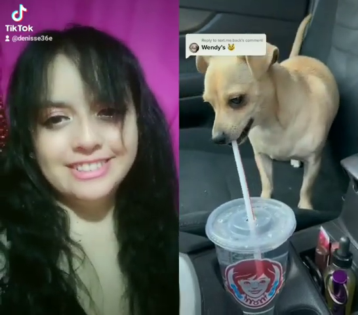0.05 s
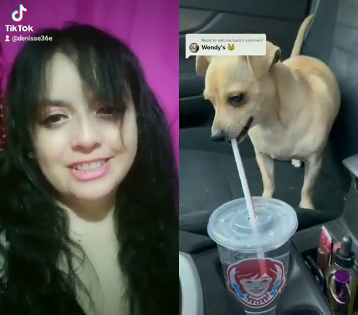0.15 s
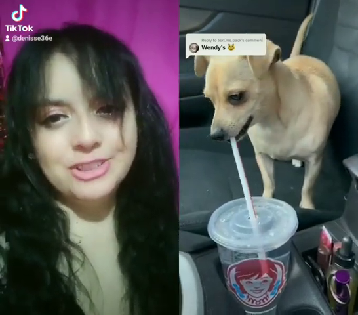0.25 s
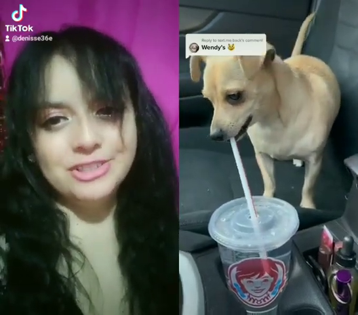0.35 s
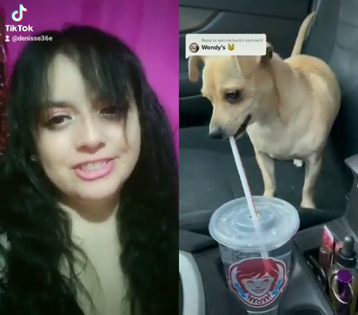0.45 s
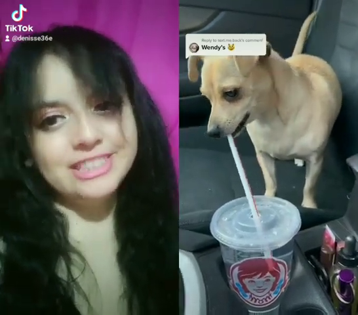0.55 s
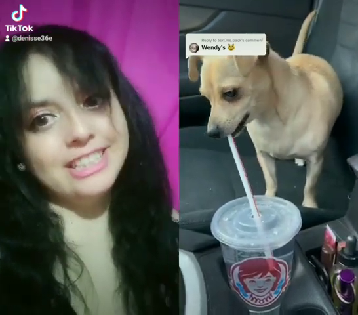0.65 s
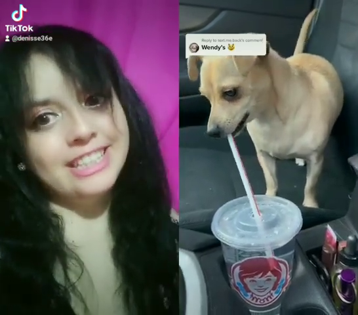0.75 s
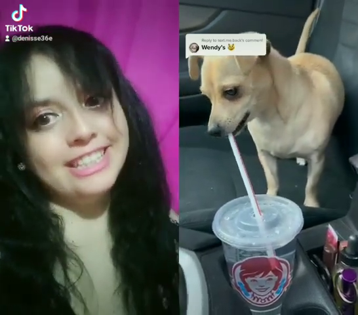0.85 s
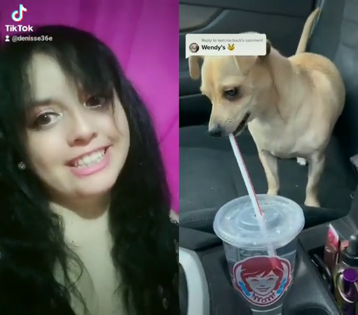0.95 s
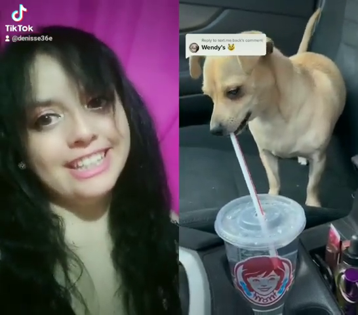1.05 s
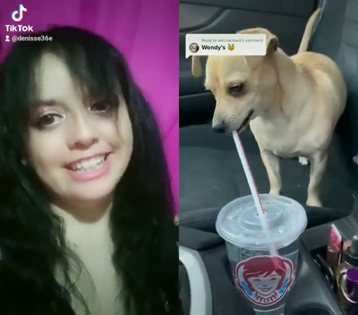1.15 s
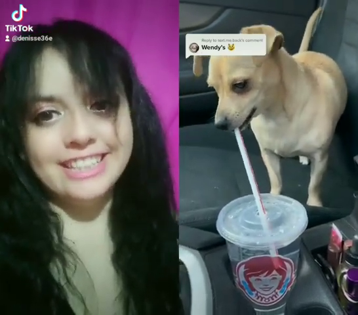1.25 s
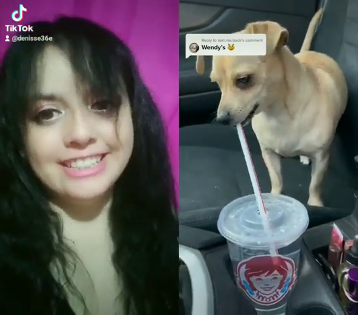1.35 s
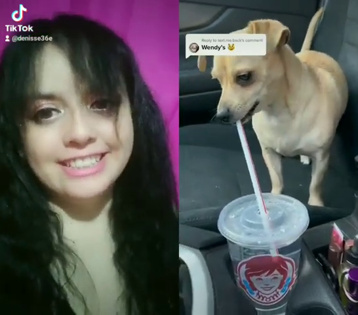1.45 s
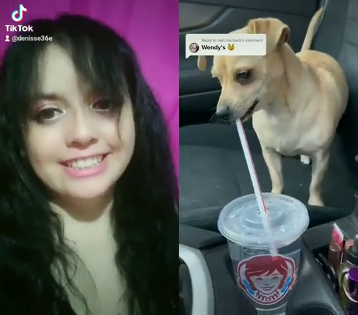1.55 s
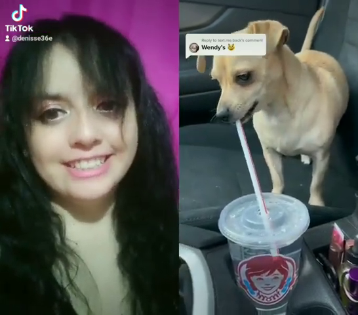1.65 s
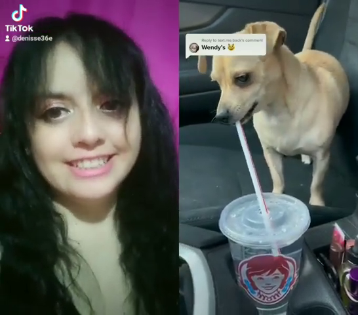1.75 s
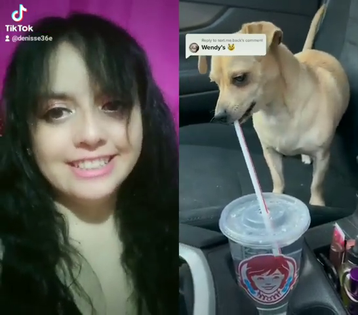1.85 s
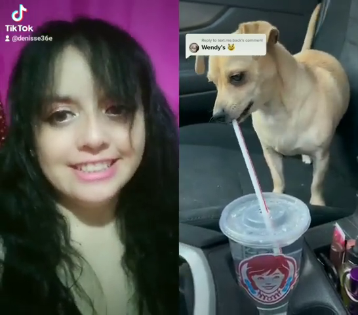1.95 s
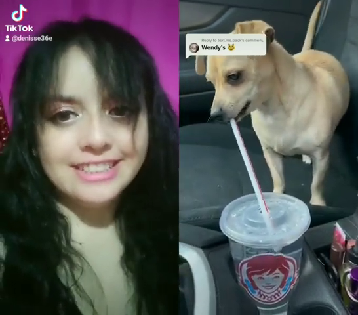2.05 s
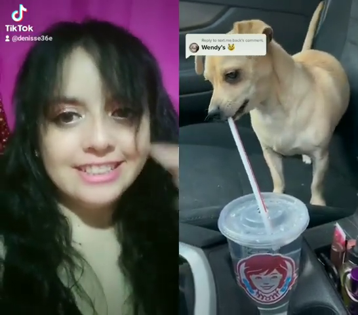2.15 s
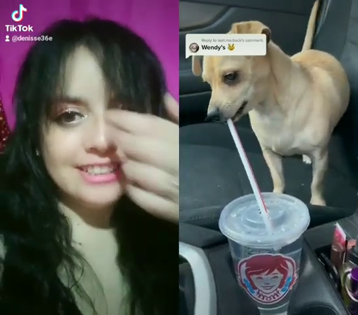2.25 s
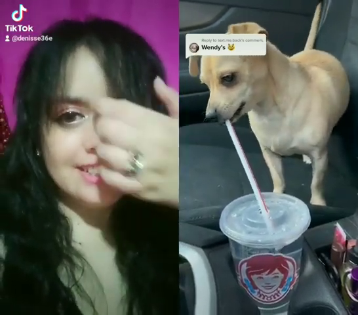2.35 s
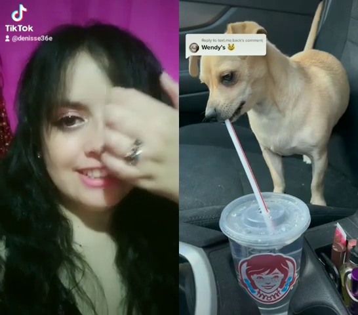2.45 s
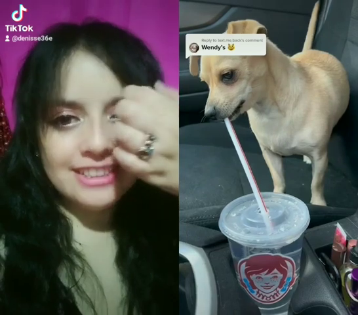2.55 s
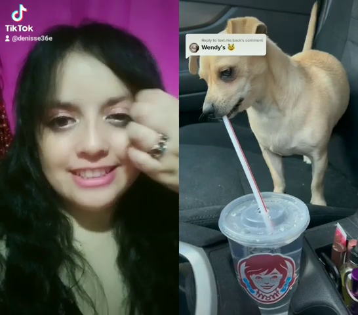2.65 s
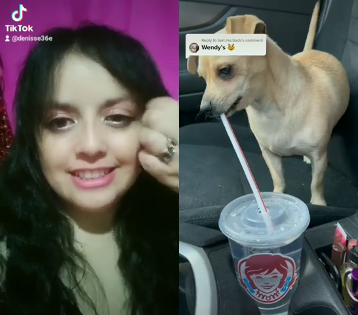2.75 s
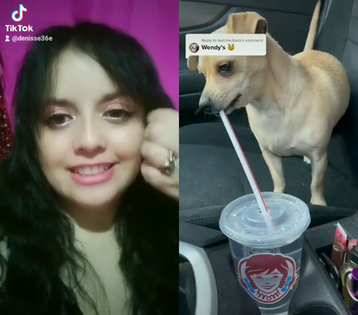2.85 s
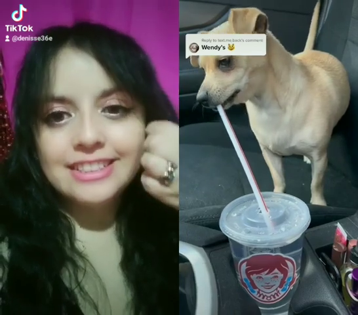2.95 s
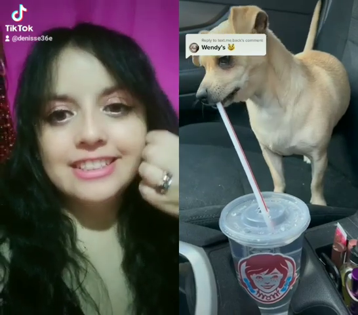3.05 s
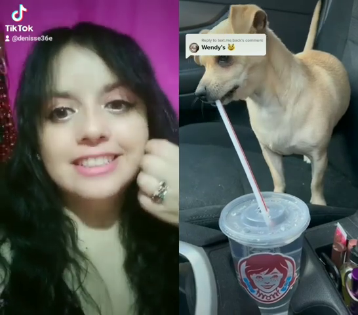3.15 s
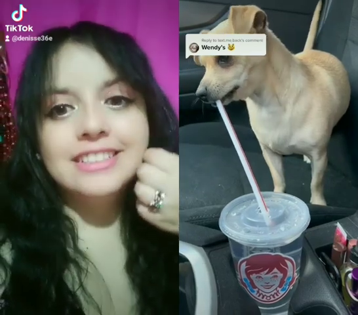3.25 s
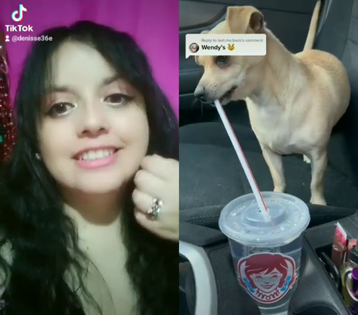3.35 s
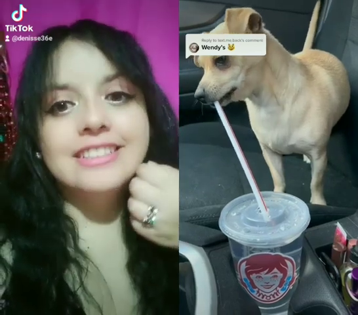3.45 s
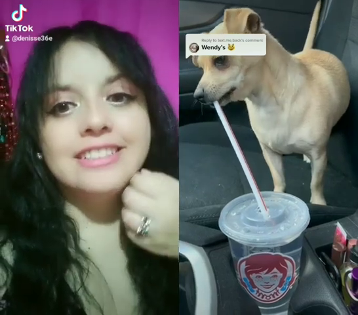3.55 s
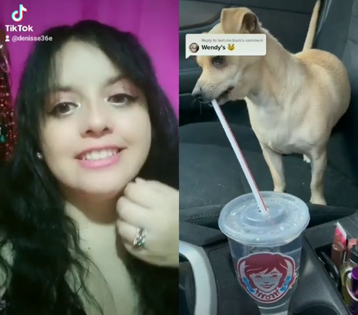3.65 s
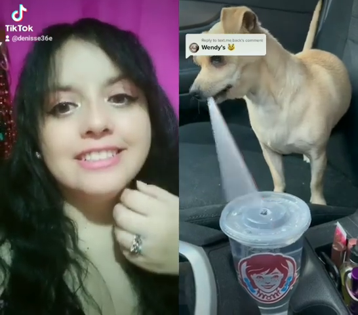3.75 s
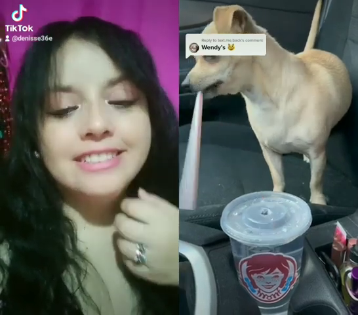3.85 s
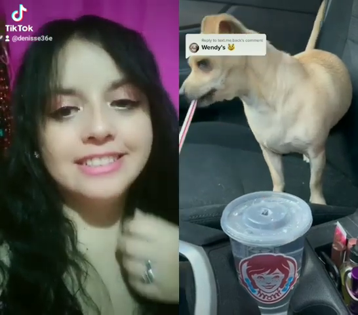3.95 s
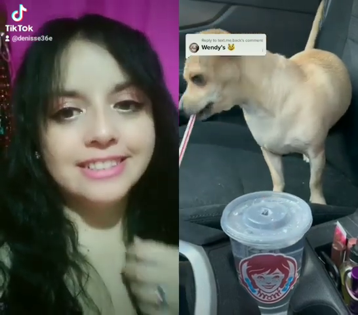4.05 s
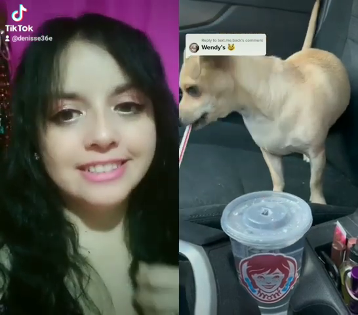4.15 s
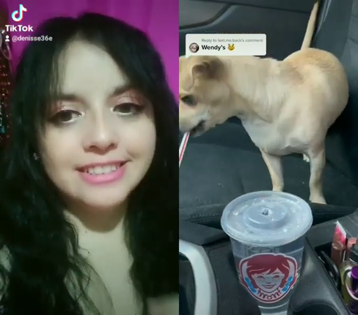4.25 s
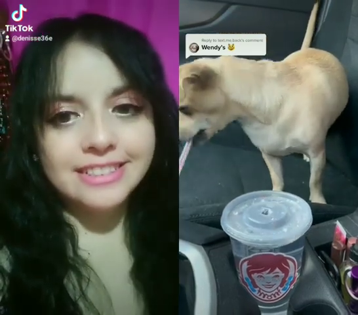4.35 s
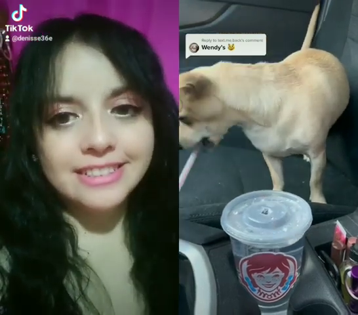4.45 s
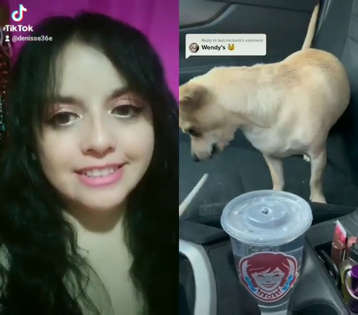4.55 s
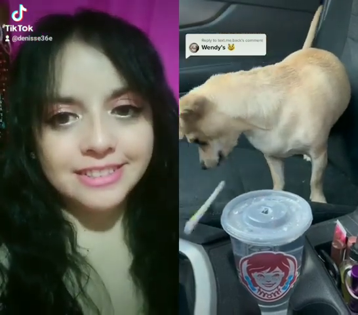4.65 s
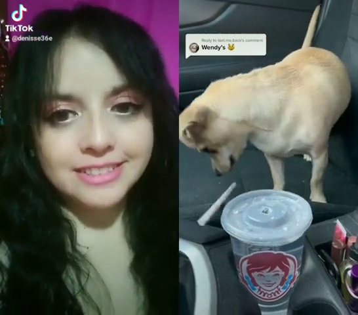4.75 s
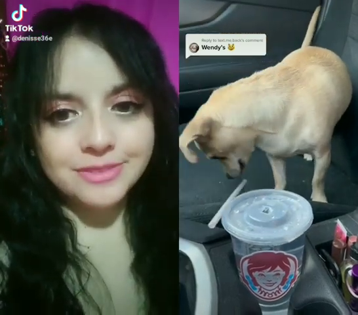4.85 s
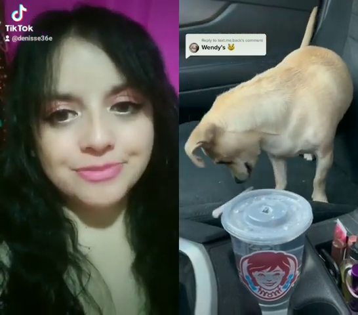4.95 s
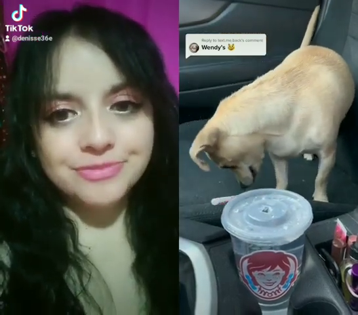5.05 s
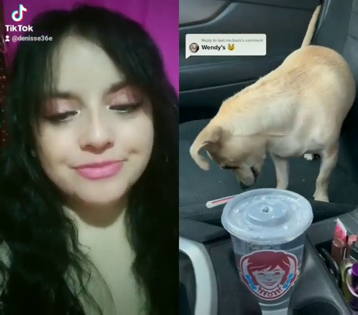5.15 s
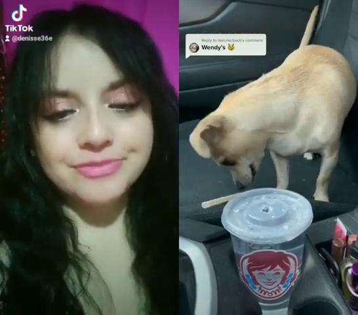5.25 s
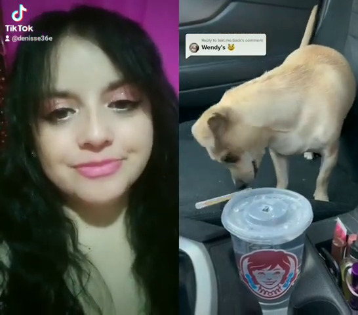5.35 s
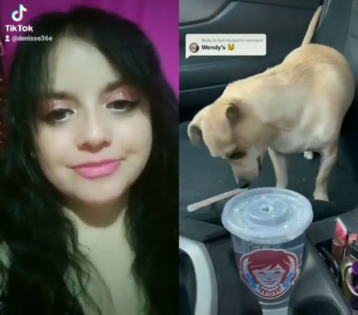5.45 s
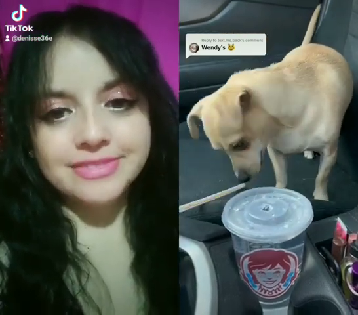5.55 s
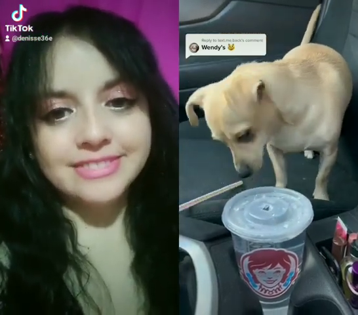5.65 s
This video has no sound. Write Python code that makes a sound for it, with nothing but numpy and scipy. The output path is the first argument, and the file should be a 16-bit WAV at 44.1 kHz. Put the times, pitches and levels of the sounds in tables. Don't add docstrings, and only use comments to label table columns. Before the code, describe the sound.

Close, dry plastic clicks and short stick-slip squeaks end in a hollow pop and light straw taps over a low engine hum.

```python
import sys
import numpy as np
from scipy import signal
from scipy.fft import rfft, irfft
from scipy.io import wavfile

SR = 44100
rng = np.random.default_rng(int(sys.argv[2]) if len(sys.argv) > 2 else 0)


def voltage_ratio(decibels):
    exponent = np.asarray(decibels, float) / 20
    return 10 ** exponent


def pcm_store(signal):
    levels = np.round(np.clip(np.atleast_2d(signal), -1, 1) * 32767)
    wavfile.write(sys.argv[1], SR, levels.astype(np.int16).T)


N = 251370


def rms_one(x):
    return x / np.sqrt(np.mean(x ** 2) + 1e-20)


def in_time(rows, outside=None, column=1):
    columns = np.transpose(rows)
    return np.interp(np.arange(N) / SR, columns[0], columns[column], outside, outside)


def drift(rate_hz):
    pole = np.exp(-2 * np.pi * rate_hz * 40 / SR)
    noise = rng.standard_normal(N // 40 + 2002)
    slow = signal.lfilter([1], [1, -2 * pole, pole ** 2], noise)[2000:]
    return np.interp(np.arange(N) / 40, np.arange(len(slow)), rms_one(slow))


def coloured(spectrum):
    hz = np.fft.rfftfreq(N, 1 / SR) + 1
    at_hz, level_db = np.transpose(spectrum)
    gain = voltage_ratio(np.interp(np.log(hz), np.log(at_hz), level_db))
    return rms_one(irfft(rfft(rng.standard_normal(N)) * gain, N))


def tone(hz, db, wander, waver_db):
    turns = np.cumsum(hz * (1 + wander)) / SR + rng.random()
    return np.sqrt(2) * voltage_ratio(db + waver_db * drift(6.2)) * np.sin(2 * np.pi * turns)


def ring(clicks, hz, t60):
    r, w = voltage_ratio(-60 / (t60 * SR)), 2 * np.pi * hz / SR
    return signal.lfilter([0, np.sin(w)], [1, -2 * r * np.cos(w), r * r], clicks + 1e-18)


def struck(modes, at, db, treble_db=0, bass_db=0, vary_db=0, rubbing=0):
    out = np.zeros(N)
    luck = rng.standard_normal((len(at), len(modes)))
    for k, (hz, mode_db, t60) in enumerate(modes):
        blows = np.zeros(N) + rubbing
        octaves = np.log2(hz / 700)
        tilt_db = treble_db * max(octaves, 0) / 3 + bass_db * max(-octaves, 0)
        np.add.at(blows, (at * SR).astype(int), voltage_ratio(db + tilt_db + vary_db * luck[:, k]))
        out += voltage_ratio(mode_db) * (-1) ** k * ring(blows, hz, t60)
    return out


def scrape(at, db, t60):
    contacts = np.zeros(N)
    contacts[(at * SR).astype(int)] = voltage_ratio(db)
    envelope = signal.lfilter([1], [1, -voltage_ratio(-60 / (t60 * SR))], contacts + 1e-18)
    return signal.lfilter([1, -.7], [1], envelope * rng.standard_normal(N))


# [t/s, peak level/dB, treble against the body/dB]
SNAPS = [(1.498, -28, -6), (1.513, -24, 3), (1.546, -23.5, 5.5), (1.564, -25.5, 8.5), (1.874, -46.5, 17),
         (1.888, -19.5, 5), (1.93, -19, 0.5), (1.936, -22.5, -3), (1.942, -26, 4), (1.949, -17, 3.5),
         (2.1186, -20.5, 8), (2.167, -25.5, 14.5), (3.2086, -13.5, -11), (3.263, -21.5, -13),
         (3.344, -18.5, -10), (3.35, -19, -14.5), (3.361, -23.5, -11.5), (3.524, -19, -7.5),
         (3.542, -20, -10), (3.556, -26, -11.5), (3.759, -29, -18), (3.8005, -19.5, -9), (3.813, -16, -8.5),
         (3.822, -17.5, 4.5), (3.838, -38, -7.5), (3.85, -41.5, 3)]
# [t/s, peak level/dB]
CREEPS = [(.969, -49), (1.464, -38.5), (1.829, -46), (2.731, -40.5), (2.794, -43.5), (2.839, -40),
          (2.901, -31), (3.619, -39.5), (3.679, -32.5)]


def single_slips():
    at, db, treble_db = np.transpose(SNAPS)
    bent_bass_db, unbent_loss_db, bending_s = 1, 23, 0.0079
    stuck_s = np.abs(np.diff(at, prepend=0))
    bass_db = bent_bass_db - unbent_loss_db * np.exp(-stuck_s / bending_s)
    snaps = [(*row, .5) for row in zip(at, db, treble_db, bass_db)]
    creeps = [(s, level_db, -8.5, -3, .5) for s, level_db in CREEPS]
    return snaps + creeps


# [rate at start f/Hz, rate at end f/Hz, unevenness 0-1, treble level/dB, bass level/dB]
SQUEAK_RATE = [(333, 321, 0.4, -12.5, 0), (352.5, 312, 0.14, -20.5, -2.5), (346.3, 347, .16, -15.5, -6.5),
               (303.5, 250, 0.4, -11, -5), (221.5, 200, .1, -8, -1), (203.6, 204, 0.05, -8, -3),
               (323, 650, 0.44, -9, -1.5)]
# [start t/s, attack t/s, hold t/s, release t/s, level/dB]
SQUEAKS = [
    (2.926, .045, 0.004, 0.036, -38),
    (3.016, .011, 0.0057, 0.015, -25.5),
    (3.151, .009, .014, .011, -26),
    (3.213, .001, 0.0032, .022, -28.5),
    (3.381, 0.0071, .012, .027, -19),
    (3.683, .006, .03, 0.019, -18.5),
    (3.802, .001, 0.0083, .006, -21.5),
]


def slip_runs():
    swell_db, fade_db = 12.5, 32.5
    slips = []
    for (first_hz, last_hz, uneven, treble_db, bass_db), (*stages, peak_db) in zip(SQUEAK_RATE, SQUEAKS):
        corner_s = np.cumsum(np.abs(stages))
        corner_db = peak_db - np.array([swell_db, 0, 0, fade_db])
        start, end = corner_s[0], corner_s[-1]
        luck = rng.standard_normal((100, 2))
        along = np.arange(100) * 2 / ((first_hz + last_hz) * (end - start))
        rate_hz = first_hz + (last_hz - first_hz) * np.minimum(along, 1)
        gaps = (1 + .4 * uneven * luck[:, 0]) / rate_hz
        at = start + np.cumsum(gaps) - gaps[0]
        level_db = np.interp(at, corner_s, corner_db) + 6.0 + 7.3 * uneven * luck[:, 1]
        slips += [(s, db, treble_db, bass_db, uneven) for s, db in zip(at, level_db) if s < end]
    return slips


# [peak t/s, rise by 20 dB t/s, fall by 20 dB t/s, bright level/dB, dull over bright/dB]
SLIDES = [(.52, 0.087, .115, -72, 5), (1.398, 0.079, 0.15, -66.5, 6), (1.502, 0.018, 0.0022, -53.5, 9),
          (2.905, 0.0027, .03, -77, 17), (2.961, 0.032, 0.15, -71.5, 21), (3.03, 0.13, 0.038, -64.5, 21.5),
          (3.164, 0.026, 0.023, -67, 25), (3.205, 0.01, 0.057, -66, 23), (3.824, 0.0011, .036, -40, -6),
          (3.996, 0.058, 0.019, -69, 0), (4.15, .03, .2, -76, 7), (4.236, 0.016, 0.02, -71, -2)]


def sliding():
    t = np.arange(N) / SR
    bright, dull = np.zeros(N), np.zeros(N)
    for peak_s, rise_s, fall_s, db, dull_db in SLIDES:
        slide = voltage_ratio(db - 20 * np.maximum((peak_s - t) / rise_s, (t - peak_s) / fall_s))
        bright += slide
        dull += voltage_ratio(dull_db) * slide
    dull = np.minimum(dull, voltage_ratio(-57.5))
    grains = (rng.random((2, N)) < 5000 / SR) * rng.standard_normal((2, N))
    grains = grains * voltage_ratio(3.9 * drift(60))
    high = np.diff(grains[0], prepend=0)
    low = signal.lfilter(*signal.butter(2, 1800, fs=SR), grains[1])
    return voltage_ratio(10) * bright * high + voltage_ratio(-2.5) * dull * low


# [f/Hz, level/dB, t60/s]
LID = [(223, -6.5, 0.019), (367, -1.5, 0.022), (452, -4.5, 0.028), (585, 1.5, 0.016), (820, -2.5, 0.012),
       (1010, -5.5, 0.024), (1299, -3.5, 0.012), (1458, -7.5, 0.013), (1765, -10, 0.012), (2258, -9, 0.012),
       (2690, -13, 0.0085), (2987, -12.5, 0.0055), (4440, -12, 0.0037), (5110, -12, 0.002),
       (6830, -14, 0.0028), (8070, -19.5, 0.0027), (9840, -27, 0.0019), (12400, -42.5, 0.00241),
       (14100, -32.5, 0.0014)]


def lid():
    at, db, treble_db, bass_db, unlike = np.transpose(single_slips() + slip_runs())
    drag_db = db + 1.05 * treble_db
    friction = sliding() + scrape(at, drag_db - 22.5, 0.014) + scrape(at, drag_db - 32.5, 0.045)
    shaken = struck(LID, at, db - 4.5, treble_db - 3.0, bass_db, 4 * unlike, friction)
    hz = np.fft.rfftfreq(N, 1 / SR)
    lag_turns = .08 * np.sqrt(hz + 30) - .0004 * hz
    return irfft(rfft(shaken) * np.exp(-2j * np.pi * lag_turns), N)


# [start t/s, length t/s, start f/Hz, end f/Hz, level/dB rms]
WHISTLES = [
    (2.938, .055, 787, 1037, -40.5),
    (2.995, 0.023, 952, 1010, -36.5),
    (3.799, .018, 949, 1440, -30.5),
]


def whistle():
    swell_db, peak_share, flutter_db = 13.5, 0.594, 2.5
    out = np.zeros(N)
    for start, length, first_hz, last_hz, db in WHISTLES:
        end = start + length
        swell = [(start, db - swell_db), (start + peak_share * length, db), (end, db - swell_db)]
        level_db = in_time(swell, -200) + flutter_db * drift(90)
        glide_hz = in_time([(start, first_hz), (end, last_hz)])
        out += tone(glide_hz, level_db, .012 * drift(73), 0)
    return out


# [t/s, level/dB]
POP = (3.8222, -10)
# [f/Hz, level/dB, t60/s]
POP_MODES = [(570, 2, 0.013), (1278, -1.5, 0.014), (2680, -15, 0.008), (4430, -16.5, 0.0079),
             (6740, -12, 0.0036), (11000, -20.5, 0.0022), (14800, -24, .0025)]
# [t/s, level/dB]
RELEASE = (3.827, -23.5)
# [f/Hz, level/dB, t60/s]
CUP = [(138.5, 3, 0.052), (203, 1, 0.11), (356, -21, 0.034)]


def cup():
    pop = struck(POP_MODES, np.array([POP[0]]), POP[1])
    thump = struck(CUP, np.array([RELEASE[0]]), RELEASE[1])
    return pop + thump


# [t/s,
# peak level/dB, thud level/dB, treble level/dB]
KNOCKS = [(0.575, -54, -12, -3), (2.101, -57.5, -13, 7.5), (2.339, -51.5, -5, -7), (3.994, -52, -10, 2.5),
          (4.044, -46, 2.5, 6.5), (4.127, -48, -6, -7), (4.153, -52, -1, -1), (4.201, -49.5, -4, -3),
          (4.23, -49.5, -17, 7.5), (4.61, -32.5, -2.5, -0.5), (4.636, -44, -4, -2), (4.652, -48, -8, 0.5),
          (4.774, -46.5, 4, -12.5)]
# [f/Hz, level/dB, t60/s]
STRAW = [(1610, -3, 0.017), (2460, 0, 0.023), (3250, -0.5, 0.0039), (4140, -4, 0.0083),
         (4600, -6.5, 0.0045), (5900, -5.5, 0.0054), (7480, -13, 0.0039), (8800, -19, 0.0034),
         (11380, -26.5, 0.0025), (14510, -20, 0.0027)]


def straw():
    at, db, thud_db, treble_db = np.transpose(KNOCKS)
    roll_s, roll_length_s, stop_s = 4.622, 0.11, .02
    roll_db, sag_db = -69, 1
    end = roll_s + roll_length_s
    roll = [(roll_s, roll_db), (end, roll_db - sag_db), (end + stop_s, roll_db - 20)]
    grains = (rng.random(N) < 1500 / SR) * rng.standard_normal(N)
    rattle = signal.lfilter(*signal.butter(1, [3400, 5200], "band", fs=SR), grains)
    rolling = voltage_ratio(in_time(roll, -200) - 1.5) * rattle
    seat = [(474, 5, 0.014), (764, -1.0, 0.0056), (1160, -11.5, 0.011)]   # f/Hz, level/dB, t60/s
    thud = struck(seat, at, db + thud_db, vary_db=1.1)
    rubbing = rolling + scrape(at, db + treble_db - 26.0, 0.041)
    return struck(STRAW, at, db - 12.0, treble_db, 0, 0.94, rubbing) + thud


def cabin(x):
    t = np.arange(SR // 8) / SR
    decay = voltage_ratio(-60 * t / 0.065) * np.clip(t / 0.0015, 0, 1)
    tail = rng.standard_normal((3, len(t))) * decay
    low = signal.sosfilt(signal.butter(4, 400, "high", fs=SR, output="sos"), tail[1])
    high = signal.sosfilt(signal.butter(2, 7000, "high", fs=SR, output="sos"), tail[2])
    walls = [voltage_ratio(-29.5) * tail[0], voltage_ratio(-47) * low + voltage_ratio(-32) * high]
    mid, side = signal.fftconvolve(walls, x[None], axes=1)[:, :N]
    return mid, side


# [multiple of the firing rate, level/dB rms]
ORDERS_DB = [(1, -55.5), (2, -48.5), (3, -49), (4.25, -60.5), (7, -63.5), (8, -60)]
# [t/s, level/dB]
IDLE = [(0, -43), (.7, -42.5), (1.06, -43.5), (1.3, -42), (2.5, -43), (2.8, -40.5), (3.1, -44),
        (3.6, -41.5), (5.7, -43)]
# [f/Hz, level/dB per Hz]
RUMBLE = [(12, -34), (20, -7), (54, -0.5), (82, -1.5), (99, -8), (145, -9.5), (211, -18), (261, -14),
          (357, -20), (420, -23), (511, -22.5), (675, -25), (733, -30), (906, -34.5), (1000, -47.5),
          (1300, -77), (2200, -120)]


def engine():
    firing_hz = 27.05
    hunting = 0.0201 * drift(2.42)
    orders = sum(tone(k * firing_hz, db, hunting, 1.9) for k, db in ORDERS_DB)
    return voltage_ratio(in_time(IDLE) + 43.5) * (orders + voltage_ratio(-48.5) * coloured(RUMBLE))


# [f/Hz, level/dB rms, side level/dB]
FAN = [(364.7, -70, -14), (519.4, -71.5, -23.5), (751.6, -72, -16.5)]
# [t/s, relative speed, level/dB]
FAN_SPEED = [(0, 0.86, -2), (.04, 1.02, 1.5), (1.2, 0.97, 1), (3, 1.007, 2.5), (4.8, .993, 0.5),
             (5.7, 0.96, 0)]
# [f/Hz, level/dB per Hz]
AIR = [(530, -38.5), (900, 0.5), (1020, -11.5), (1100, -7), (1360, -13), (1470, -11.5), (1750, -16.5),
       (2300, -10.5), (3300, -17.5), (6250, -23), (8980, -33.5), (12400, -37), (16000, -37.5)]
# [f/Hz, level/dB per Hz]
WIDE = [(88, -51), (150, -23), (182, -36), (244, -13), (354, -0.5), (406, -10.5), (555, 0.5), (675, -9.5),
        (745, 1.5), (837, -10.5), (1290, -16.5), (1390, -27), (2060, -30), (11500, -44.5), (16000, -51)]


def blower():
    speed = in_time(FAN_SPEED)
    whines = [tone(hz * speed, db, 0.00319 * drift(4.7), 2.5) for hz, db, _ in FAN]
    air = voltage_ratio(-76 + 1.1 * drift(8.8)) * coloured(AIR)
    mid = voltage_ratio(in_time(FAN_SPEED, column=2)) * (air + sum(whines))
    whines_side = sum(voltage_ratio(side_db) * whine for (_, _, side_db), whine in zip(FAN, whines))
    return mid, voltage_ratio(-70) * coloured(WIDE) + whines_side


def scene():
    near = lid() + whistle() + cup() + straw()
    tail, tail_side = cabin(near)
    air, air_side = blower()
    mid = near + tail + air + engine()
    return mid + (tail_side + air_side) * [[1], [-1]]


def band_limit(x):
    return signal.sosfilt(signal.butter(12, 15850, fs=SR, output="sos"), x)


def record(dry):
    closing = np.minimum(np.arange(N)[::-1] / 200, 1)
    return band_limit(dry * closing)


dry = scene()
out = record(dry)
pcm_store(out)
```